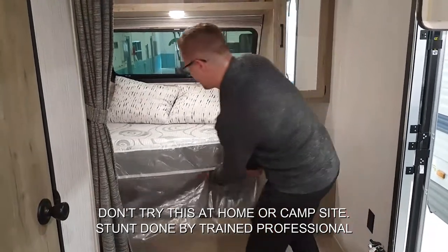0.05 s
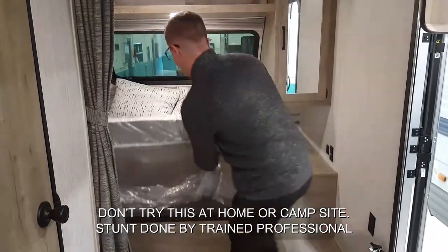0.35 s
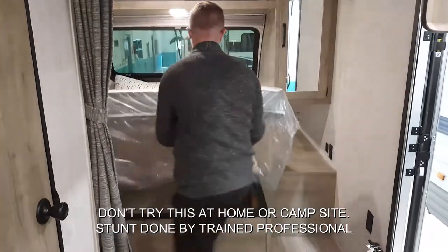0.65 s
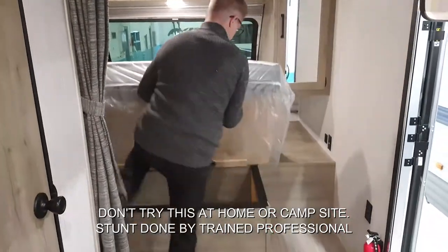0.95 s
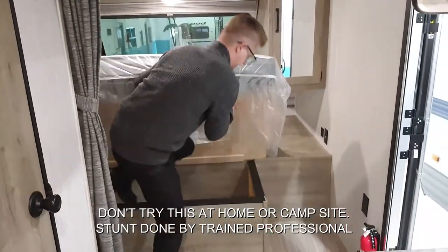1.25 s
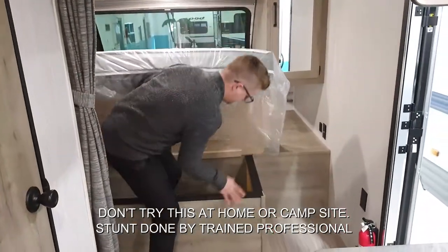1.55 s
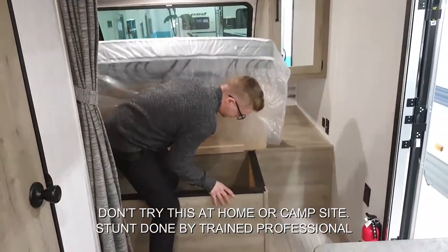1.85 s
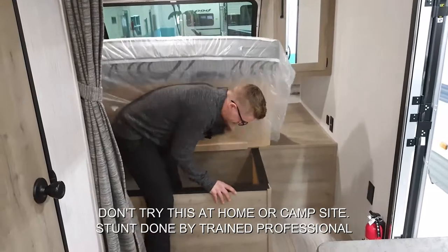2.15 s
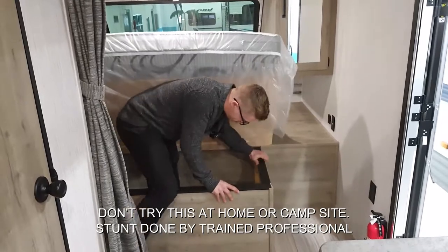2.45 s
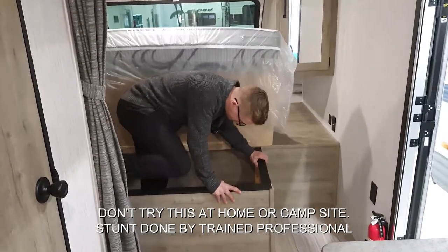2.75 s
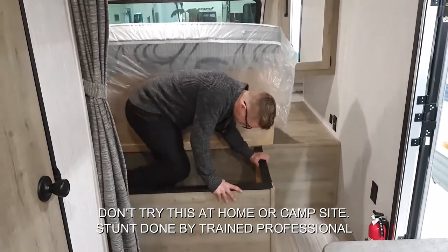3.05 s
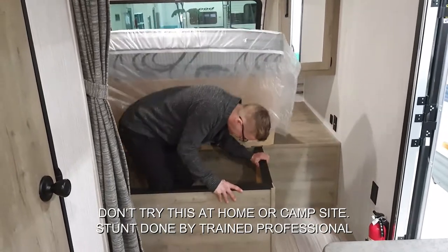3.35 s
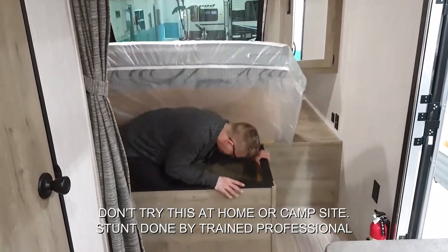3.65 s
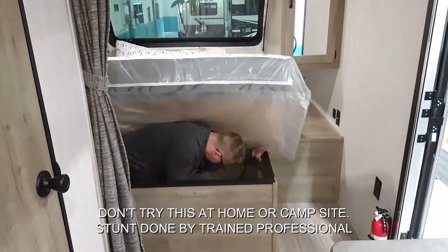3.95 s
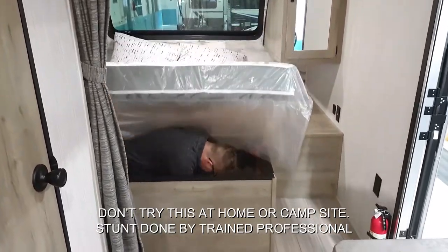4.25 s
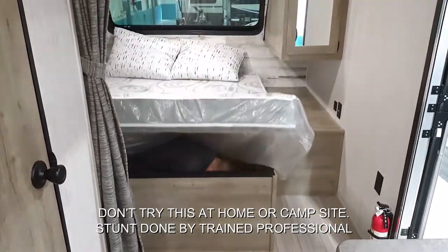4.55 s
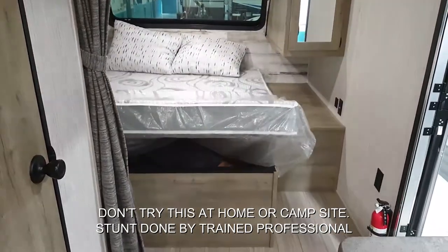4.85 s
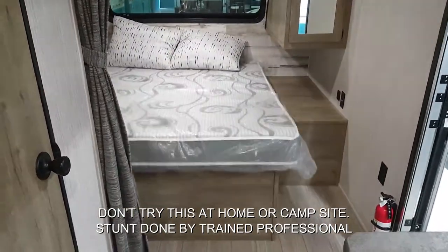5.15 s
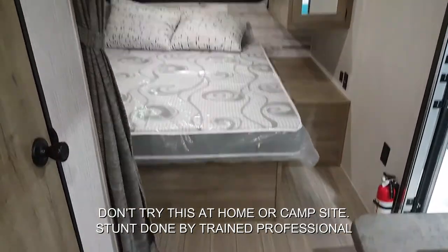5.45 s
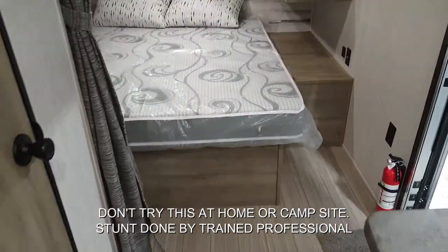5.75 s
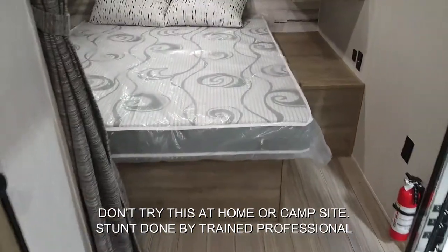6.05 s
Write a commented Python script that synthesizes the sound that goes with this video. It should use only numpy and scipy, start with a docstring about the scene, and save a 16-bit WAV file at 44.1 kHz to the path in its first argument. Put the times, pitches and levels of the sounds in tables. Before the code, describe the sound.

Crackling, rustling plastic film and a dull rumble, with a hand slap and hollow wooden thumps as a person climbs under a bed.

```python
"""Plastic film crinkles over a dull rumble as a wrapped mattress is lifted on its hinged platform in a
small trailer bedroom: strained film buckles in ticks, sliding film hisses. Someone brushes past it,
slaps a hand on the rim and climbs into the hollow plywood box under the bed. Knees and elbows thump
the panels and excite the modes of the box; then the platform sinks, rustling, and lands with a soft thud."""
import sys
import numpy as np
from scipy import signal
from scipy.fft import rfft, irfft
from scipy.io import wavfile
from scipy.ndimage import map_coordinates

SR = 44100
rng = np.random.default_rng(int(sys.argv[2]) if len(sys.argv) > 2 else 0)


def unload_wav(signal):
    """Save mono or channel-first audio to the path in sys.argv[1] as 16-bit WAV at rate SR, clipped to [-1, 1]."""
    wavfile.write(
        sys.argv[1],
        SR,
        np.round(np.clip(np.atleast_2d(signal).T, -1, 1) * 32767).astype(np.int16),
    )


N = 273178

# Pulls and brushes that move the film; billow and fizz are relative to the crinkle:
# full_speed_s, hold_s, rise_20db_s, fall_20db_s, crinkle_db, billow_db, fizz_db
FILM_STROKES = [ (0.06, .03, .085, .05, -26.5, -1, -19), (0.38, .54, .16, .21, -29.5, -2.5, -9.5),
                (0.789, .035, .07, .09, -28.5, 1, -19), (1.08, .07, .1, .1, -48, 3, -12),
                (1.26, 0.1, .11, .03, -40, -2, -10), (1.6, .22, .5, .18, -52.5, 1, -8.5),
                (1.71, .05, 0.13, .14, -44.5, 0, -8.5), (1.981, .23, .095, .075, -32, -1.5, -6),
                (2.292, 0.049, 0.27, .12, -43.5, 1.5, -18), (2.474, .014, .008, .07, -40, 0, -16),
                (2.528, .015, .025, .09, -36, 0, -10), (2.68, .012, .02, .1, -49, -2, -13),
                (2.62, .35, .2, .4, -59, -3, -16), (3.05, .15, .12, .12, -63, -10, -15),
                (3.22, .085, .012, .075, -45.5, -1, -15), (3.411, .07, .055, .08, -42.5, 1.5, -10.5),
                (3.55, .15, 0.03, 0.7, -55, 0, -9), (3.831, .055, .13, 0.1453, -35.5, -2.5, -11.5),
                (3.975, .03, 0.11, .11, -42.5, 0, -14), (4.16, .05, .04, .1, -47, 4, -13),
                (4.25, .35, .11, .13, -39.5, 0, -9.5), (4.62, .03, .035, .1, -36, 3, -9),
                (4.96, 0.11, .075, 0.06, -42.5, 1, -9.5), (5.11, .04, .045, 0.063, -35.5, 2.5, -3.5),
                (5.189, .085, 0.1054, .09, -35, 0, -13), (5.386, .018, .065, .12, -36.5, 0.5, -11),
                (5.659, .05, .2, .09, -63, -1, -15)]
# How far the film is creased (1) rather than sliding (0): time_s, strain
FILM_STRAIN = [(.1, 0.07), (.35, 0.92), (1.0, 0.99), (1.9, 0.3), (3.8, 0.2), (5.2, 0.01)]
# Spectra of the film's midrange crinkle, high fizz and low billow: frequency_hz, density_db
CRINKLE_SPECTRUM = [(350, -18.5), (750, -4), (1100, 0.5), (1550, -0.5), (2200, -1), (3300, -3),
                    (5300, -4.5), (8000, -8), (11300, -23.5), (15700, -34)]
FIZZ_SPECTRUM = [(3000, -10.5), (7500, 5), (11000, 1.5), (15800, -15.5)]
BILLOW_SPECTRUM = [(40, -48.5), (100, -17.5), (190, -4.5), (300, 0), (450, 2), (600, 3.5), (1100, -4),
                   (2200, -26.5)]
# Shoves of the mattress on its platform: full_speed_s, hold_s, rise_20db_s, fall_20db_s, level_db
MATTRESS_SHOVES = [(0.064, 0.039, 0.1, 0.02, -32), (0.45, 0.08, .15, 0.15, -46),
                   (0.783, 0.11, 0.25, .13, -37), (1.26, .1, .06, .04, -50), (2.001, 0.19, 0.13, 0.28, -38),
                   (2.55, .06, 0.43, .25, -41), (3.28, .03, .03, .08, -36), (3.45, .03, .04, .09, -33),
                   (3.87, .09, .06, .12, -25), (4.303, .25, .1, .14, -22), (4.95, .39, .09, .11, -38),
                   (5.107, 0.033, .05, 0.16, -28.5), (5.42, 0.037, 0.14, 0.06, -26.5)]
# Spectrum of the dragging mattress: frequency_hz, density_db
RUMBLE_SPECTRUM = [(28, -31.5), (52, -2), (90, -3), (135, 7.5), (200, -3.5), (290, 0.5), (500, -13.5),
                   (1200, -43), (4000, -72)]
# Large creases snapping through: start_s, peak_db, pitch_hz
CREASE_SNAPS = [(.398, -14, 3000), (.478, -15, 5030), (.692, -12, 5000), (.700, -14, 7000),
                (.813, -11, 1600), (.887, -13, 2500), (.905, -8, 2930), (.988, -14, 978),
                (1.336, -20, 4340), (1.362, -17, 3230), (1.709, -20, 2600), (1.782, -28, 6950),
                (1.981, -17, 5850), (2.473, -24, 1994), (2.623, -33, 1010), (3.051, -39, 1385),
                (3.217, -31, 1980), (3.284, -24, 7100), (4.145, -31, 2720), (5.055, -20, 3030),
                (5.301, -23, 1704)]
# Blows on the box: start_s, thud_peak_db, panel_hz, panel_t60_s, knock_relative_db
BOX_BLOWS = [ (0.634, -18, 230, .052, -3), (1.750, -24.5, 156, .06, -4.5), (1.96, -15, 160, 0.091, -9),
             (2.074, -12.5, 160, 0.04, -17.5), (2.156, -11, 219, 0.088, -11.5),
             (2.3826, 5.5, 315, .06, -18), (2.482, -16, 169, .1, -14), (2.524, -6, 310, .068, -6),
             (2.538, -2.5, 250, 0.045, -10.5), (2.684, -26, 210, .1, -15), (3.216, -31, 182, .15, -4),
             (3.260, -7.5, 245, .04, -2.5), (3.273, -14, 152, .096, 2.5), (3.387, -19, 228, .03, -16),
             (3.420, -7, 117, .07, -24), (3.440, -9.5, 136, .075, -9), (3.885, 1.5, 219, .05, -3),
             (3.890, 2.5, 127, 0.13, -19.5), (3.996, -18.5, 125, .05, -6), (4.183, -26.5, 106, .058, -19),
             (4.2832, 2, 237, .04, -4), (4.294, -6.5, 124, 0.055, -1), (4.309, -0.5, 246, 0.044, -8),
             (4.331, -6, 108, 0.051, 0), (4.367, -8, 202, .08, -13), (4.390, -1.5, 95, .06, -9),
             (4.413, -1, 212, 0.042, -13.5), (4.443, -6.5, 195, .07, -1), (4.53, -6, 68.6, .06, -13),
             (5.413, -13, 130, .03, -4.5), (5.962, -49, 115, .12, -22)]
# Modes of the plywood box: pitch_hz, level_db, t60_s
BOX_MODES = [(53.7, -14.5, 0.14), (84.9, 2.5, 0.13), (100, -14.5, 0.047), (127, 2.5, 0.13),
             (160, -1, 0.058), (196.8, -9.5, 0.3), (250, -2, 0.11), (294, 3.5, 0.088), (327.6, -4.5, 0.18),
             (377.7, 4.5, 0.042), (440, -7, 0.09), (480, -8.5, 0.04), (613, -16.5, 0.18)]
# Spectra of a contact's hollow knock and bright crack: frequency_hz, density_db
KNOCK_SPECTRUM = [(150, -15), (400, 16), (570, 5.5), (800, -5.5), (1150, -11), (1600, -28), (3000, -45),
                  (8000, -61.5)]
CRACK_SPECTRUM = [(400, -5), (1000, 8), (1900, 5), (3000, -1), (8000, -11.5), (15000, -35.5)]
# Cloth sliding over taut film:
# full_speed_s, hold_s, rise_20db_s, fall_20db_s, level_db, slip_hz, climb_octaves_per_s
CLOTH_SLIDES = [(1.205, .12, 0.06, .08, -37.5, 430, .3), (1.352, .012, 0.0297, .022, -33, 520, 0),
                (1.876, .03, .008, .03, -33, 380, 0), (1.94, .028, .065, .04, -20, 540, 8)]
# Spectrum of the cloth's zip: frequency_hz, density_db
ZIP_SPECTRUM = [(150, -28), (380, 4.5), (750, -1.5), (1200, -5), (2200, -10.5), (3200, -19.5),
                (5000, -19), (12000, -36)]
# A palm on the rim: start_s, crack_peak_db
PALM_SLAPS = [(2.3752, -4.5)]
# Spectrum of the thin side wall: frequency_hz, density_db
WALL_SPECTRUM = [(150, -38), (240, -1), (330, -1.5), (570, -4), (800, -18.5), (3000, -53)]
# Reverberation time of the cabin: frequency_hz, t60_s
CABIN_DECAY = [(100, 0.22), (300, 0.11), (2000, 0.15), (12000, 0.047)]
# Spectrum of the steady background hiss: frequency_hz, density_db
AIR_SPECTRUM = [(25, -32), (60, -11), (130, -10), (200, -14), (400, -27.5), (1000, -28), (3000, -27.5),
                (6000, -22.5), (10600, -22.5), (15700, -28)]


def amp(db):
    """Decibels to amplitude ratio."""
    return np.exp(np.asarray(db) * (np.log(10) / 20))


def unit(x):
    """Normalisation to rms 1."""
    return x / np.sqrt(np.mean(x ** 2) + 1e-20)


def unit_peak(x):
    """Normalisation to peak 1."""
    return x / (np.abs(x).max() + 1e-20)


def along(points, hz):
    """Interpolation on a logarithmic frequency axis."""
    frequencies, values = np.transpose(points)
    return np.interp(np.log(hz + 1), np.log(frequencies + 1), values)


def wobble(rate_hz):
    """Smooth random modulation: a spline through rate_hz knots a second."""
    return map_coordinates(rng.standard_normal(4096), [np.arange(N) * rate_hz / SR], mode="wrap")


def colour(x, spectrum):
    """Minimum-phase filtering: folding the cepstrum makes the response causal."""
    size = 4096
    cepstrum = irfft(np.log(amp(along(spectrum, np.fft.rfftfreq(size, 1 / SR)))))
    fold = np.r_[1, np.full(size // 2 - 1, 2), np.zeros(size // 2)]
    response = irfft(np.exp(rfft(cepstrum * fold)))
    return signal.fftconvolve(x, response)[:len(x)]


def resonate(x, hz, q):
    """A second-order resonance."""
    return signal.lfilter(*signal.iirpeak(hz, q, SR), x)


def burst(t, t60):
    """Exponential decay of noise, 60 dB in t60 seconds."""
    return rng.standard_normal(len(t)) * amp(-60 * t / t60)


def add(track, start_s, sound):
    """Superposition of a sound on the track."""
    part = track[round(start_s * SR):][:len(sound)]
    part += sound[:len(part)]


def motion(full_speed_s, hold, rise, fall):
    """Envelope of one movement: exponential growth, a plateau, exponential decay."""
    span_s = np.array([full_speed_s - 4 * rise, full_speed_s + hold + 4 * fall])
    first, last = np.clip(span_s * SR, 0, N).astype(int)
    t = np.arange(first, last) / SR - full_speed_s
    away = np.maximum(-t / rise, (t - hold) / fall)
    gain = np.zeros(N)
    gain[first:last] = amp(-20 * np.maximum(away, 0))
    return gain


def crackle(rate_hz, spread_db):
    """Shot noise: a Poisson train of impulses of uneven size."""
    happens = rng.random(N) < rate_hz / SR
    size = amp(spread_db * np.minimum(rng.exponential(size=N), 4))
    return unit(happens * size * rng.choice([-1, 1], N) / np.sqrt(rate_hz))


def flurries(rate_hz, life_s):
    """Avalanches: one buckle sets off its neighbours, so activity jumps and then relaxes."""
    starts = (rng.random(N) < rate_hz / SR) * rng.exponential(size=N)
    activity = signal.lfilter([1], [1, -np.exp(-1 / (life_s * SR))], starts)
    return np.sqrt(unit(0.44 + activity))


def stroke_gains():
    """Incoherent addition: the strokes sum in power to give the crinkle, billow and fizz gains."""
    sizes = amp([(db, db + billow_db, db + fizz_db) for *_, db, billow_db, fizz_db in FILM_STROKES])
    moves = np.array([motion(*stroke[:4]) for stroke in FILM_STROKES])
    return np.sqrt(sizes.T ** 2 @ moves ** 2)


def film_rustle(flutter_db=1.48, flutter_hz=22):
    """Buckling and friction: strained film ticks, sliding film hisses, and both shake the loose sheet."""
    fits = amp(flutter_db * wobble(flutter_hz))  # the film moves unevenly
    crinkle_gain, billow_gain, fizz_gain = stroke_gains() * fits
    strain = np.interp(np.arange(N) / SR, *np.transpose(FILM_STRAIN))
    buckle_hz = 700 * (crinkle_gain / crinkle_gain.max()) ** .23  # faster motion, more buckles
    buckles = strain * crackle(buckle_hz, spread_db=4)
    rubbing = flurries(rate_hz=290, life_s=0.002) * rng.standard_normal(N)

    def mix(ticks):
        """Constant-power blend of rubbing and buckles."""
        return (rubbing + ticks * buckles) / np.hypot(1, ticks * strain)

    crinkle = unit(colour(mix(ticks=0.72), CRINKLE_SPECTRUM))
    flicker = amp(2.5 * wobble(45))
    fizz = unit(flicker * colour(mix(ticks=1.9), FIZZ_SPECTRUM))
    billow = unit(colour(buckles + 0.8 * rng.standard_normal(N), BILLOW_SPECTRUM))
    return crinkle_gain * crinkle + fizz_gain * fizz + billow_gain * billow


def mattress_drag():
    """Sliding friction: the mattress and the body under it drag on the boards with a dull rumble."""
    friction = crackle(rate_hz=400, spread_db=-1) + 0.95 * rng.standard_normal(N)
    power = sum((amp(db) * motion(*timing)) ** 2 for *timing, db in MATTRESS_SHOVES)
    return np.sqrt(power) * unit(colour(friction, RUMBLE_SPECTRUM))


def crease_snaps():
    """Snap-through instability: a large crease flips with a tick that rings briefly in the sheet."""
    out, t = np.zeros(N), np.arange(SR // 15) / SR
    for start_s, db, hz in CREASE_SNAPS:
        tick = 1.5 * (t == 0) + burst(t, .005) + .25 * burst(t, .05)
        add(out, start_s, amp(db) * unit_peak(resonate(tick, hz, q=2.5)))
    return out


def box_thumps(blows):
    """Modal excitation: a blow bends one panel and drives the box's modes near that panel's pitch."""
    out, t = np.zeros(N), np.arange(SR // 2) / SR
    for start_s, db, hz, panel_t60, knock_db in blows:
        modes = sum(amp(mode_db + rng.normal(0, 1) - 60 * t / t60) * np.sin(2 * np.pi * mode_hz * t)
                    for mode_hz, mode_db, t60 in BOX_MODES)
        ring = unit_peak(resonate(modes, hz, q=1.4))
        panel = np.sin(2 * np.pi * hz * t) * amp(-60 * t / panel_t60)
        swell = 1 - np.exp(-t * hz * 3.8)  # a padded limb loads the wood within the first half cycle
        thud = unit_peak(swell * (panel + 0.69 * ring))
        # Bony contacts add a knock, and a crack that grows with it.
        contact = (t == 0) + 0.084 * burst(t, 0.029) + 0.01624 * burst(t, 0.081)
        knock = unit_peak(colour(contact, KNOCK_SPECTRUM))
        crack_noise = (burst(t, 0.038) + 0.25 * burst(t, 0.1194)) * (1 - np.exp(-t / 0.003))
        crack = unit_peak(colour(crack_noise, CRACK_SPECTRUM))
        crack_db = -22.5 + .55 * knock_db
        add(out, start_s, amp(db) * (thud + amp(knock_db) * knock + amp(crack_db) * crack))
    return out


def cloth_slides():
    """Stick-slip friction: cloth on the film makes a rough zip whose pitch follows the slip rate."""
    out, t = np.zeros(N), np.arange(N) / SR
    for full_speed_s, hold, rise, fall, db, slip_hz, climb in CLOTH_SLIDES:
        rate_hz = slip_hz * 2 ** np.clip(climb * (t - full_speed_s), -1, 1)
        slip_count = np.floor(np.cumsum(rate_hz * (1 + .055 * wobble(300))) / SR)
        slips = unit(np.diff(slip_count, prepend=0) * amp(2 * wobble(400)))
        friction = slips + .95 * rng.standard_normal(N)
        zipping = unit(colour(friction - friction.mean(), ZIP_SPECTRUM))
        out += amp(db) * motion(full_speed_s, hold, rise, fall) * zipping
    return out


def palm_slap():
    """Impact excitation: a flat palm cracks on the rim and sets the thin side wall chattering."""
    out, t = np.zeros(N), np.arange(SR // 2) / SR
    for start_s, db in PALM_SLAPS:
        attack = 1 - np.exp(-t / 0.0046)
        contact = attack * (burst(t, .034) + .045 * burst(t, .18))
        crack = unit_peak(colour(contact, CRACK_SPECTRUM))
        wall = unit_peak(colour(attack * burst(t, 0.16), WALL_SPECTRUM))
        add(out, start_s, amp(db) * (crack + amp(-3.5) * wall))
    return out


def body_settling(count=6, start_s=4.445, gap_s=.027, level_db=-9, fade_db_per_s=40):
    """Damping: the body comes to rest on the boards in ever weaker bumps, as rows like BOX_BLOWS."""
    panel_hz, panel_t60_s, knock_db = 130, 0.067, -17.5
    jitter, detune = rng.standard_normal((count, 2)).T
    delays_s = gap_s * (np.arange(count) + .5 + 0.17 * jitter)
    pitches_hz = panel_hz * 2 ** (0.29 * detune)
    return [(start_s + delay, level_db - fade_db_per_s * delay, hz, panel_t60_s, knock_db)
            for delay, hz in zip(delays_s, pitches_hz)]


def cabin_reverb(x):
    """Short reverberation of a small cabin, with little bass; the treble dies first."""
    hz, t, noise = signal.stft(rng.standard_normal(SR // 2), SR, nperseg=256)
    decay = amp(-60 * t / along(CABIN_DECAY, hz)[:, None])
    tail = signal.istft(noise * decay, SR, nperseg=256)[1]
    tail = signal.sosfilt(signal.butter(2, 220, "high", fs=SR, output="sos"), tail)
    response = np.pad(tail / np.linalg.norm(tail), (SR // 300, 0))  # delay of the first reflection
    return signal.fftconvolve(x, response)[:N]


def scene():
    """Superposition: film and wood sound directly and through the cabin, over a faint steady hiss."""
    plastic = film_rustle() + crease_snaps() + cloth_slides()
    wood = box_thumps(BOX_BLOWS + body_settling()) + palm_slap() + mattress_drag()
    air = amp(-63) * unit(colour(rng.standard_normal(N), AIR_SPECTRUM))
    reverb = cabin_reverb(amp(-19.5) * plastic + amp(-13.5) * wood)
    return (plastic + wood + reverb + air)[None]


def record(dry):
    """Band limiting and overload: the microphone sheds deep bass, hard blows clip, the top is cut off."""
    low_hz, top_hz = 42, 15850
    x = signal.sosfilt(signal.butter(4, low_hz, "high", fs=SR, output="sos"), dry)
    x = np.clip(x, -.99, .99)
    return irfft(rfft(x) * (np.fft.rfftfreq(N, 1 / SR) < top_hz), N)


dry = scene()
out = record(dry)
unload_wav(out)
```